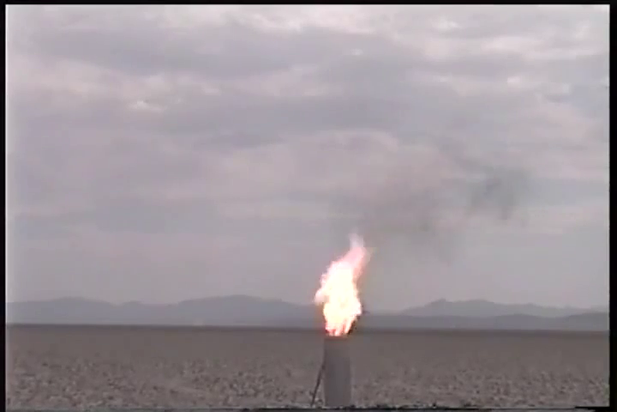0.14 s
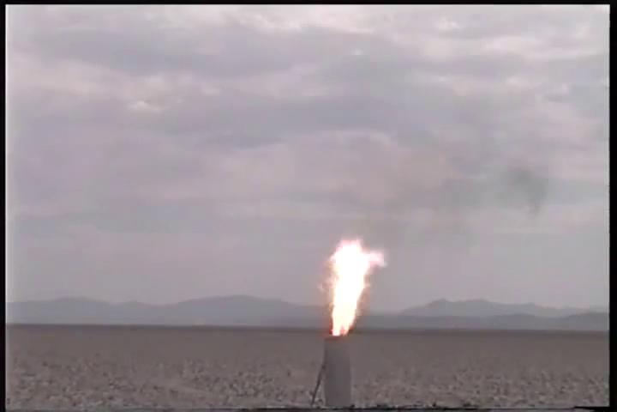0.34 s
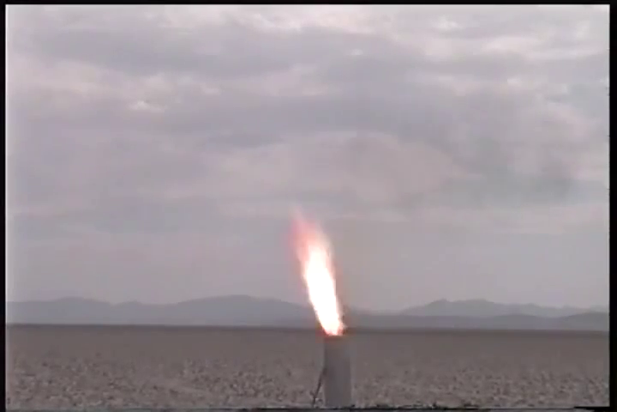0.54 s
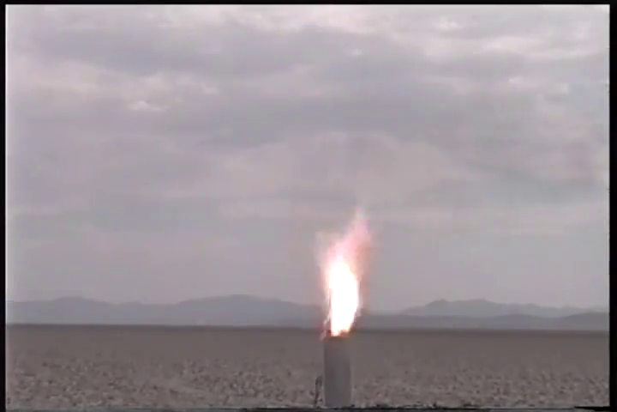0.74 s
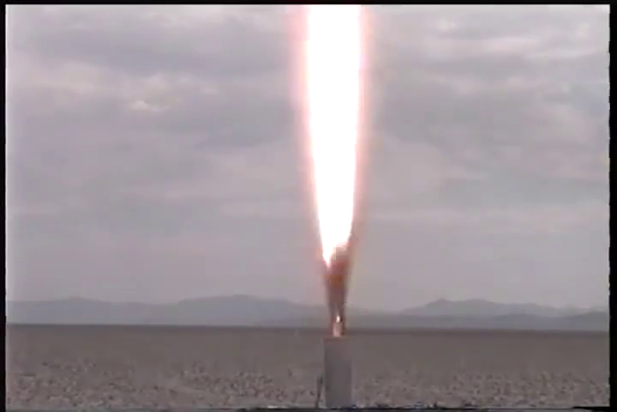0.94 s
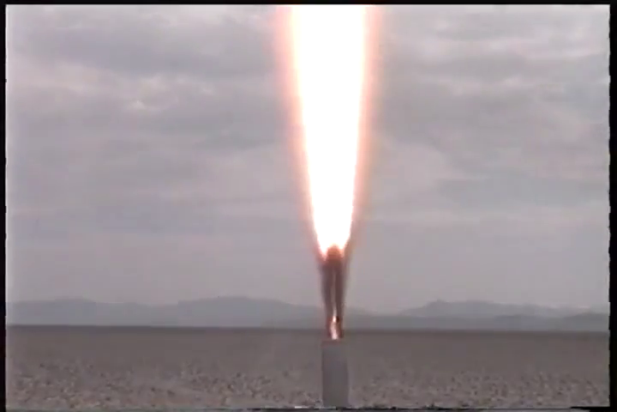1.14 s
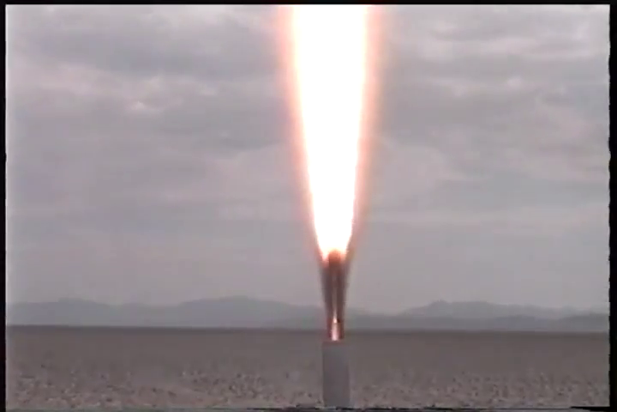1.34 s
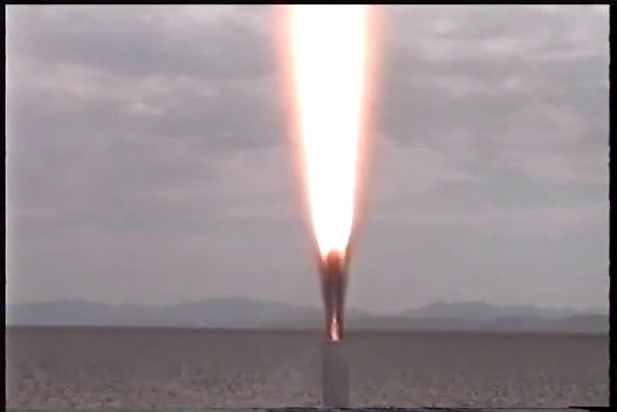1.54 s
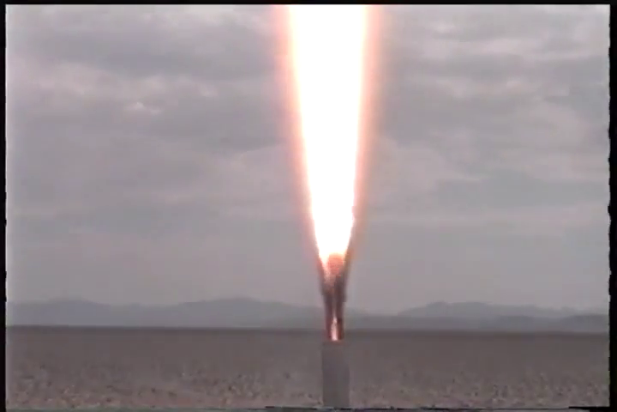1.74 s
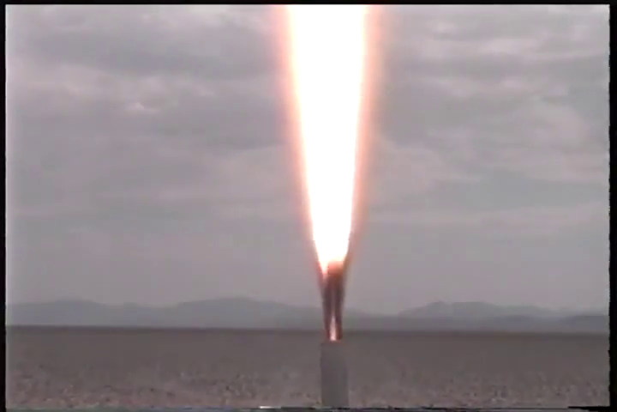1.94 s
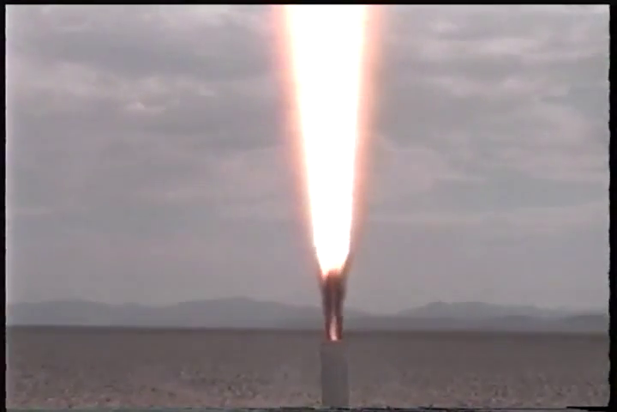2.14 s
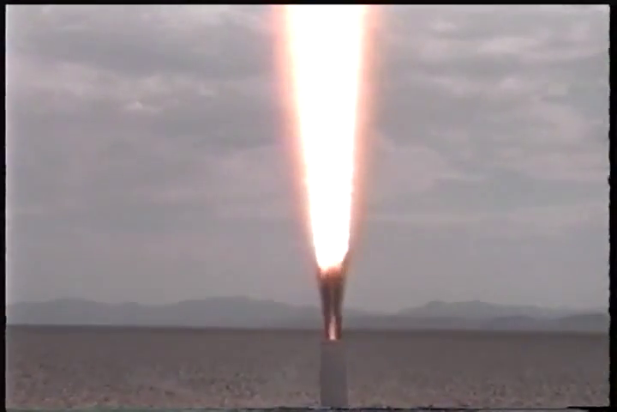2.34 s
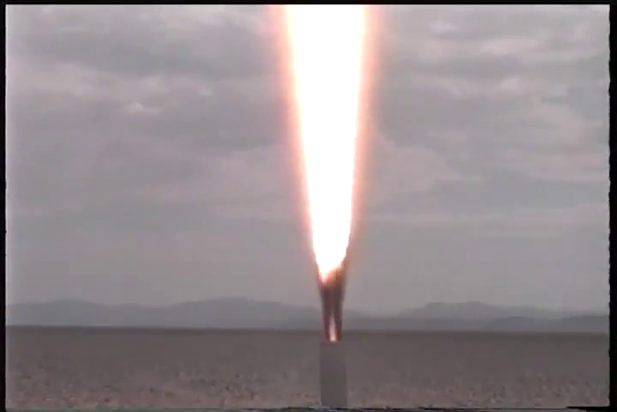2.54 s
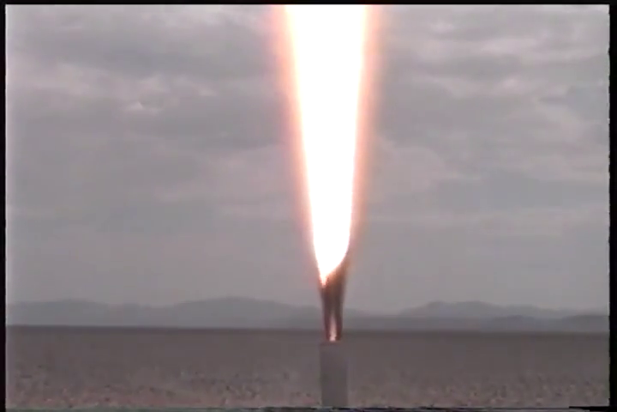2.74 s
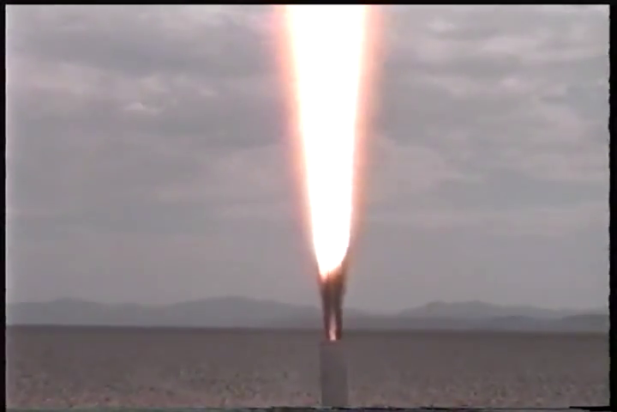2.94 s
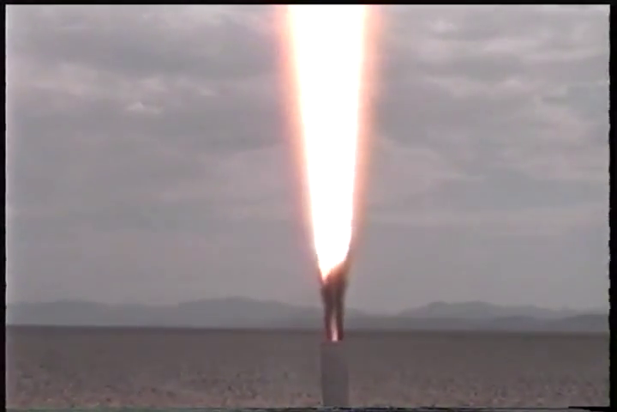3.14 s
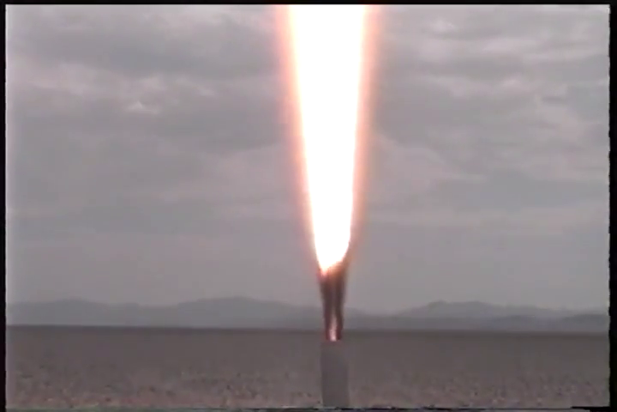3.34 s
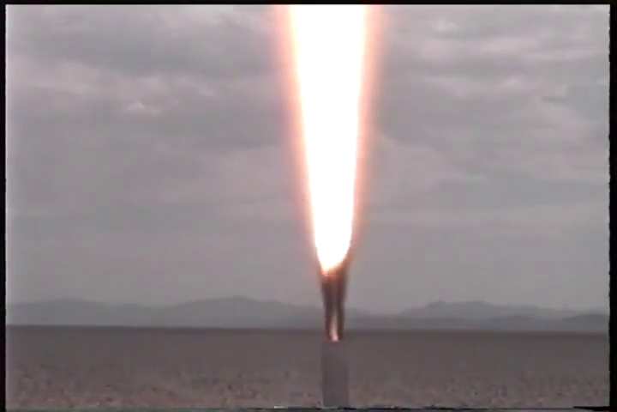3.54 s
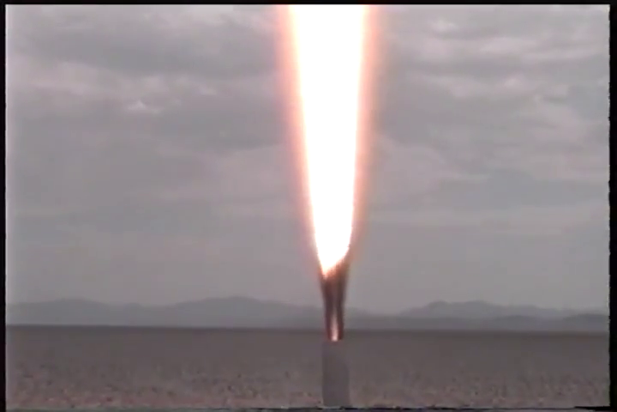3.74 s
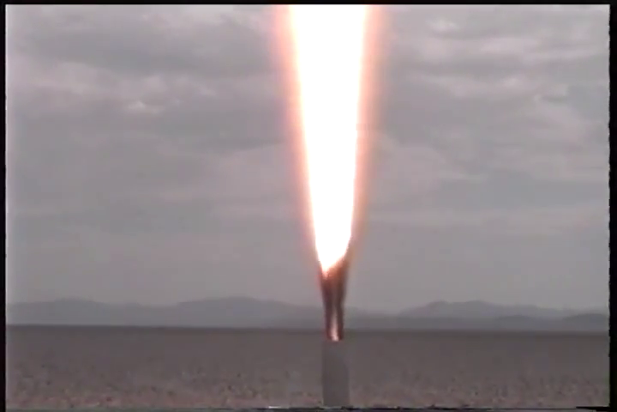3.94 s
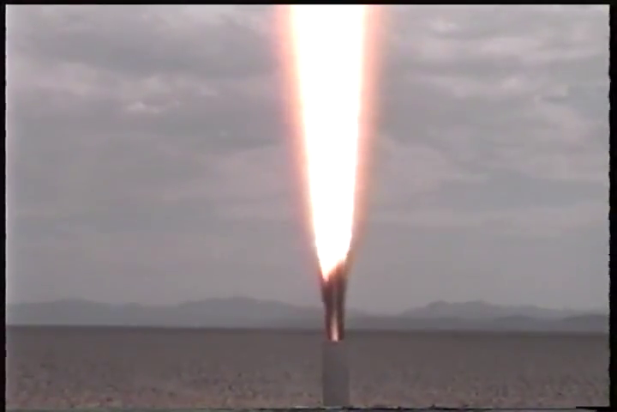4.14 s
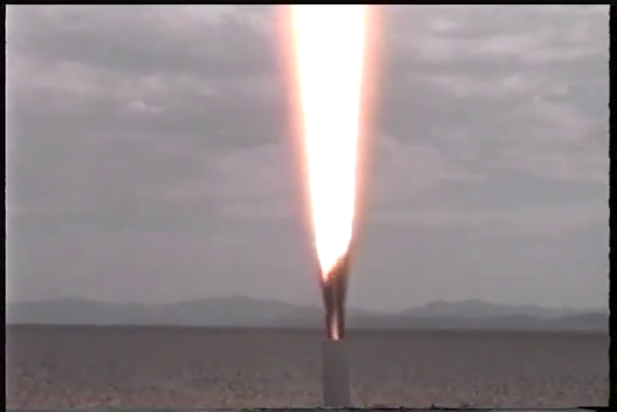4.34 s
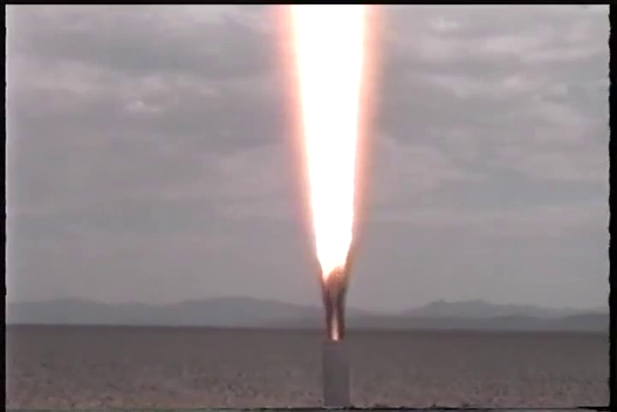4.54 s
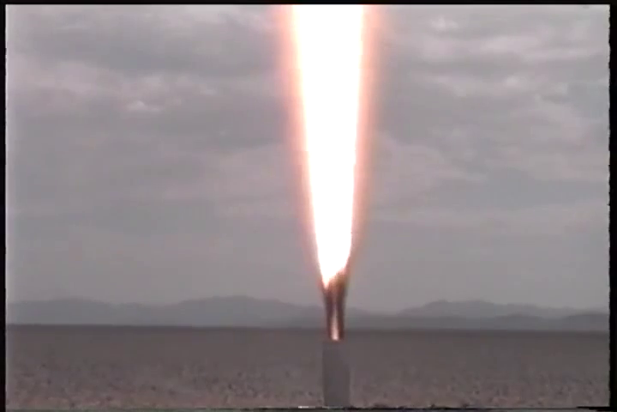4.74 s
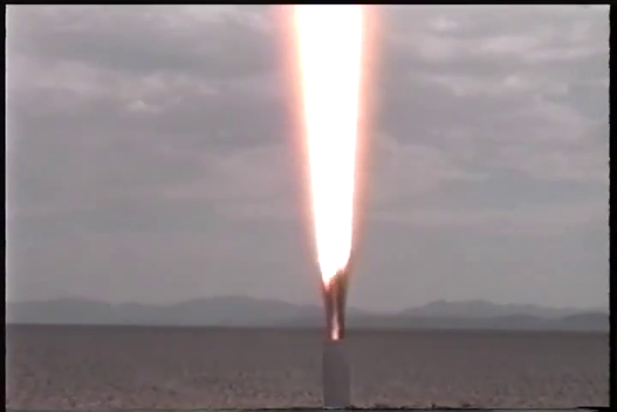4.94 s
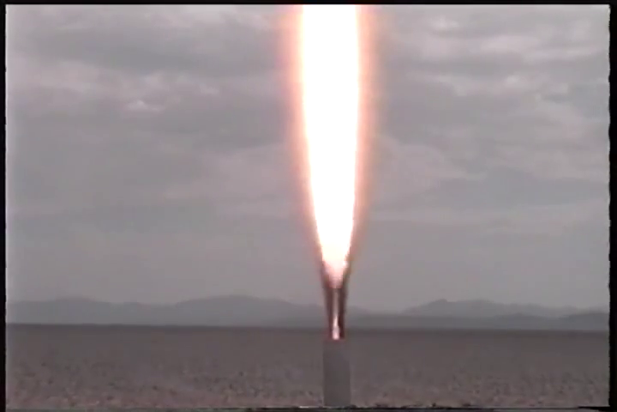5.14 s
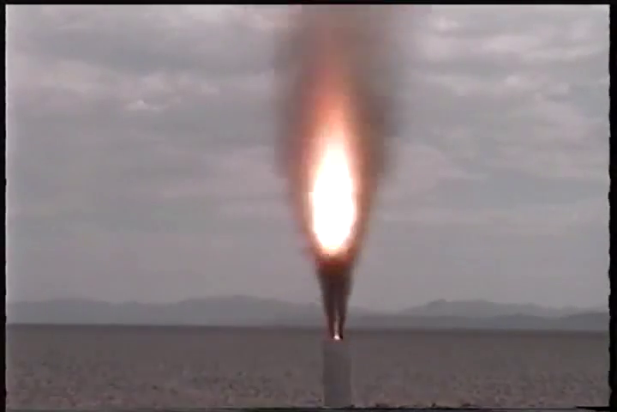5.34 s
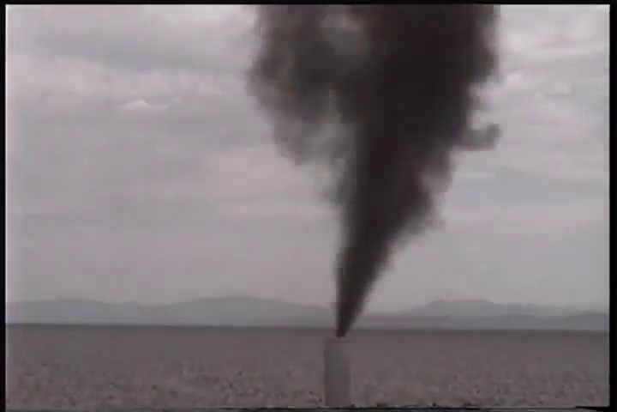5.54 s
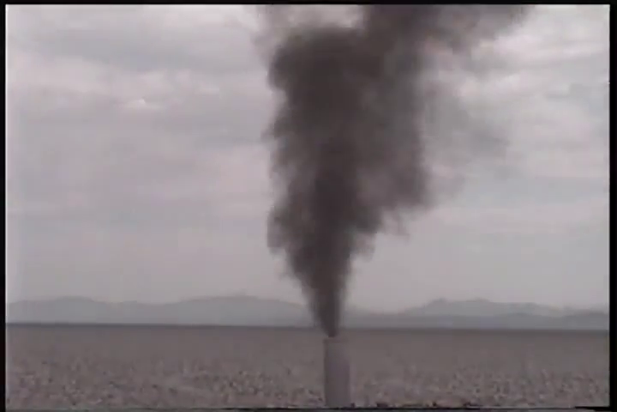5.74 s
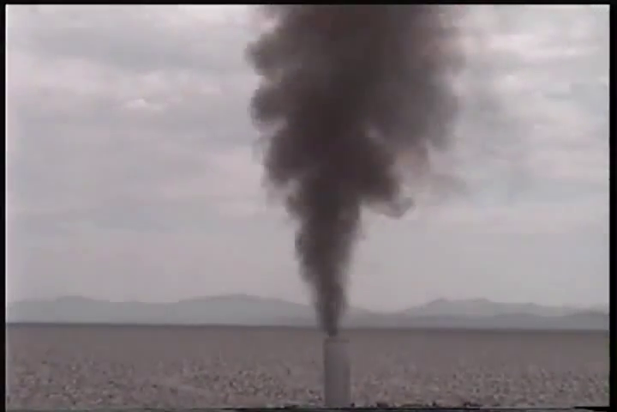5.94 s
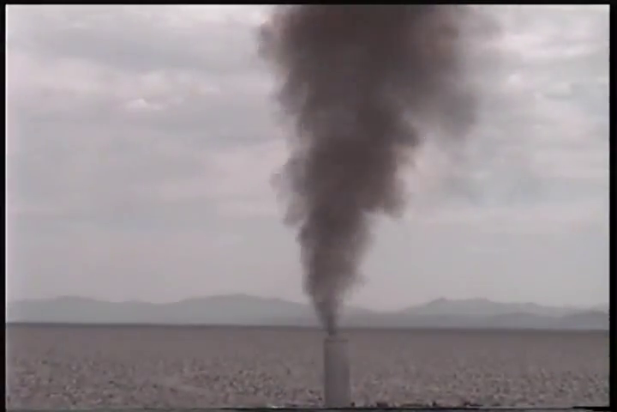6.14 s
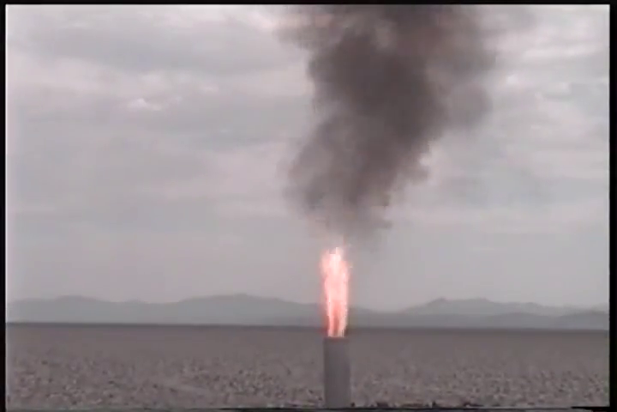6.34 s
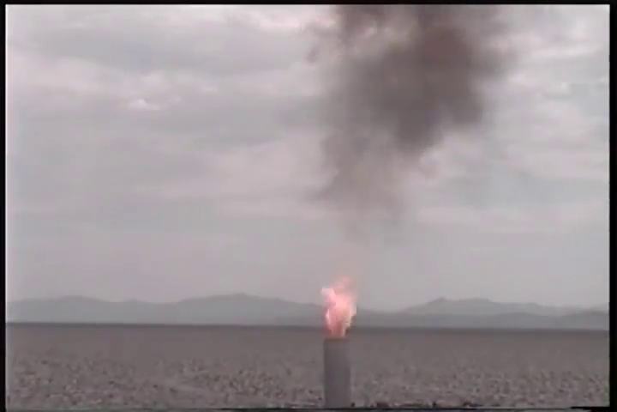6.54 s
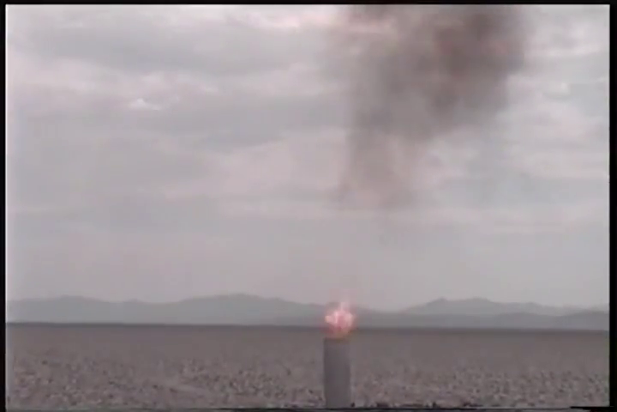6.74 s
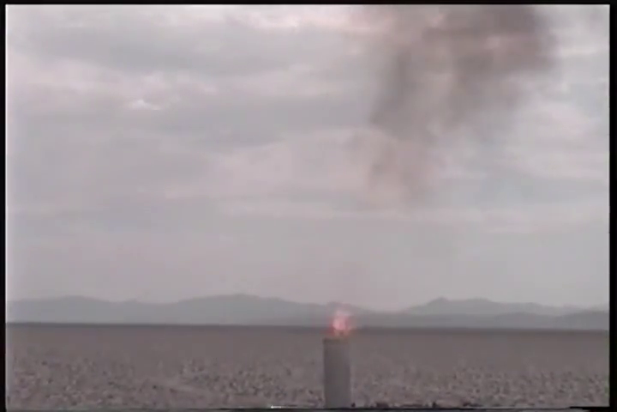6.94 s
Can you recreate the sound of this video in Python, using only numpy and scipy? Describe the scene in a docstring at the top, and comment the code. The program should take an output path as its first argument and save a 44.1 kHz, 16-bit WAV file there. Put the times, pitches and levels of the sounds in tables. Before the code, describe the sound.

Close to a small microphone in open desert, a rocket motor catches with a fluttering, puffing flame. It surges into a rushing, sizzling roar, briefly whistling and distorting the sound, and holds steady for a few seconds. The roar cuts out and a last hiss fades. Leftover gas pops softly alight and dies down with one tiny tick, over faint microphone hiss and a thin whine.

```python
"""A solid rocket motor burns on a test stand in open desert, nozzle up, close to a small camera.
First, over the camera's faint hiss and whine, an unsteady flame puffs and grows. After about a second
the gas goes faster than sound: a brief whistle, and a roaring, hissing jet that overloads the microphone.
Near 5.5 s the fuel runs out, the jet collapses and the motor's case vents smoke.
Then the last gas relights with a soft pop, and the flame dies down with one faint tick."""
import sys
import numpy as np
from scipy.fft import rfft, irfft, next_fast_len
from scipy.io import wavfile
from scipy.ndimage import map_coordinates

SR = 44100
rng = np.random.default_rng(int(sys.argv[2]) if len(sys.argv) > 2 else 0)


def to_wav(sig):
    """Store sig (one row per channel, or 1-D mono) as 16-bit WAV at the path in sys.argv[1].

    Samples outside -1..1 are clipped; the rate is SR.
    """
    pcm = np.clip(np.atleast_2d(sig), -1, 1) * 32767
    pcm = np.round(pcm).astype(np.int16)
    wavfile.write(sys.argv[1], SR, pcm.T)  # frames by channels


N = 308023
T = np.arange(N) / SR

# tone colour (how strong each frequency is) of the camera's own hiss: f/Hz, level/dB
CAMERA_HISS = [(20, 10), (150, 6.5), (400, -2), (1200, -2), (3200, -7), (4700, -4.5), (5800, -10.5),
               (8000, -20.5), (16000, -18.5)]
# faint tones from the camera's tape drive: f/Hz, level/dB
DRIVE_TONES = [(1080, -93), (2170, -87.5), (2815, -86), (3165, -88), (4296, -89.5), (4630, -90.5)]
# how the microphone housing rings, lifting some frequencies and weakening others: f/Hz, level/dB
MIC_HOUSING = [(2000, -2), (2700, 3), (3350, 2), (3650, -1.5), (3900, -1.5), (4350, -6.5), (4550, -10.5),
               (5000, -6.5), (5450, 0.5), (6400, 2.5), (8200, -4.5), (9600, -15), (11500, -5), (14000, -8)]
# low rumble of the flame: f/Hz, level/dB
FLAME_RUMBLE = [(20, -35.5), (50, -18.5), (90, -11), (150, -5.5), (255, -1.5), (320, -2.5), (430, -6),
                (800, -24.5), (2000, -57)]
# roar of the plume, the column of gas above the nozzle: f/Hz, level/dB
PLUME_ROAR = [(100, -41), (280, -4.5), (450, 1), (1200, 1.5), (2000, -3), (3200, -9), (5000, -16),
              (9000, -42), (16000, -46.5)]
# dull hiss of slowly venting gas: f/Hz, level/dB
DULL_HISS = [(25, -14), (45, -18.5), (100, -30.5), (500, -26.5), (1300, -7.5), (1650, -2), (2600, -1.8),
             (3400, -1.1), (5000, -10.5), (8000, -25.5), (16000, -49.5)]
# bright hiss of fast gas: f/Hz, level/dB
BRIGHT_HISS = [(1500, -28), (3000, -8.5), (4500, 4.5), (6200, -0.5), (7800, -8.5), (9000, -21),
               (12000, -18.5), (16000, -31.5)]
# sizzle of the shock waves standing in the jet: f/Hz, level/dB
SHOCK_SIZZLE = [(2500, -38), (5000, -8.5), (7500, 1.5), (10000, -2), (13000, -6.5), (16000, -8)]
# gas flow through the nozzle builds, holds, gives a last surge and vents away: t/s, level/dB
NOZZLE_FLOW = [(0, -53.5), (0.4, -36), (0.57, -29), (0.92, -24), (0.99, -14.5), (3, -16.5), (5.2, -16.5),
               (5.48, -19.5), (5.54, -15.8), (5.655, -17.5), (5.71, -25), (5.735, -34.5), (6.0, -45),
               (6.18, -68.5), (6.3, -76), (6.6, -115)]
# the flame flaps most in a lazy stream, little once the jet tears it up: flow level/dB, flap level/dB
FLAP_BY_FLOW = [(-56, 1.5), (-41.5, 0), (-33.5, 3.5), (-28.5, -1), (-21, -9), (-15, -8.5)]
# the young burn surges and falters: t/s, half length/s, level change/dB
BURN_SURGES = [(0.005, 0.017, -3.5), (0.26, 0.03, 1.5), (0.313, 0.016, -6), (0.404, 0.028, -4.5),
               (0.554, 0.014, -2.5)]
# pockets of gas that catch fire all at once: t/s, level/dB, f/Hz, time to fade by 60 dB/s
GAS_POCKETS = [(0.281, -15, 290, .018), (0.403, -6.5, 230, .02), (0.4266, -4.5, 230, .022),
               (0.696, -3, 260, 0.055), (.834, -4, 250, .025), (0.844, 0.5, 330, 0.017),
               (5.502, -3, 290, 0.013), (6.298, -13, 350, .013)]

RELIGHT_S, RELIGHT_RISE_S = 6.296, 0.0068  # the last gas catches fire again


def amp(db):
    """Turn decibels into a gain, the number a signal is multiplied by."""
    return 10 ** (np.asarray(db) / 20)


def since(s):
    """Seconds since a moment, 0 before it."""
    return np.maximum(T - s, 0)


def burst(s, rise_s, t60, hold_s=0):
    """Gain of something that starts at s, rises, holds, then fades by 60 dB every t60 seconds."""
    return (1 - np.exp(-since(s) / rise_s)) * amp(-60 * since(s + hold_s) / t60)


def colour(points):
    """Join (f/Hz, level/dB) points into a curve that gives the gain at any frequency."""
    f, db = np.transpose(points)
    return lambda hz: amp(np.interp(np.log(hz + 1), np.log(f + 1), db))


def filtered(x, response):
    """Multiply each frequency in x by response(hz)."""
    size = next_fast_len(N + SR // 2)
    hz = np.fft.rfftfreq(size, 1 / SR)
    return irfft(rfft(x, size) * response(hz), size)[:N]


def wobble(rate):
    """A smooth curve through `rate` random values a second."""
    return map_coordinates(rng.standard_normal(int(N * rate / SR) + 4), [T * rate])


def noise(points):
    """Noise with the given tone colour and an average strength (rms) of 1."""
    x = filtered(rng.standard_normal(N), colour(points))
    return x / x.std()


def turbulence(points, swirl_rate, swirl_db):
    """Noise of strength 1 that swells with every passing swirl of gas."""
    x = noise(points) * amp(swirl_db * wobble(swirl_rate))
    return x / x.std()


def camera():
    """The background: steady hiss and the slightly wavering whine of the tape drive."""
    whine = sum(amp(db) * np.sqrt(2) * np.sin(2 * np.pi * hz * T + .8 * wobble(25))
                for hz, db in DRIVE_TONES)
    return amp(-71.5) * noise(CAMERA_HISS) + whine


def tick():
    """A tiny, bright spit of gas as the flame dies down."""
    return amp(-68) * burst(6.742, rise_s=0.0005, t60=0.03) * noise(BRIGHT_HISS)


def whistle(start_s=1.1, hold_s=0.069, start_hz=1324, sag_hz_per_s=690):
    """As pressure peaks, gas whistles over the nozzle's edge; the note wavers and sags."""
    hz = start_hz - sag_hz_per_s * np.minimum(since(start_s), hold_s)
    phase = 2 * np.pi * np.cumsum(hz * (1 + 0.004 * wobble(90))) / SR
    strength = amp(-18) * burst(start_s, rise_s=0.012, t60=0.09, hold_s=hold_s)
    return strength * np.sqrt(2) * np.sin(phase)


def puffs():
    """Each gas pocket gives the air one soft push that swings back and quickly dies."""
    return sum(amp(db) * burst(s, rise_s=0.0011, t60=t60) * np.sin(2 * np.pi * hz * since(s))
               for s, db, hz, t60 in GAS_POCKETS)


def flow():
    """Level of the gas flow through the nozzle in dB, with a short spurt at the relight."""
    main_db = np.interp(T, *np.transpose(NOZZLE_FLOW))
    spurt = amp(-58) * burst(RELIGHT_S, RELIGHT_RISE_S, t60=0.28)
    return 20 * np.log10(amp(main_db) + spurt)


def supersonic(halfway_db=-22):
    """Near 0 while the gas leaves the nozzle slower than sound, near 1 once it is faster."""
    return 1 - 1 / (1 + amp(flow() - halfway_db) ** 4)


def fire(full_s=0.7, lift_s=0.87, settle_s=0.84, flare_s=0.33, out_s=5.495):
    """Gain of the fire outside the nozzle, from its first growth to the small relight."""
    growing_db = -31 * np.maximum(full_s - T, 0)
    # the jet lifts the fire off the nozzle, where it settles to a quieter burn
    lifted_db = -3 * supersonic() - 6.5 * (1 - np.exp(-since(lift_s) / settle_s))
    # as the fuel runs out the fire flares, then goes out
    ending_db = 7 * np.minimum(since(out_s - flare_s) / flare_s, 1) - 604 * since(out_s)
    relit = amp(-48.5) * burst(RELIGHT_S, RELIGHT_RISE_S, t60=0.89)
    return amp(-15 + growing_db + lifted_db + ending_db) + relit


def sputter(flutter_db, rate, steady_s):
    """Gain of the uneven young burn: it surges and flutters, then steadies as pressure builds."""
    unsteady = np.clip(1 - (T / steady_s) ** 2, 0, 1)
    surges_db = sum(db * np.exp(-((T - s) / half_s) ** 2) for s, half_s, db in BURN_SURGES)
    return amp(surges_db + flutter_db * unsteady * np.tanh(wobble(rate)))


def flame(spent_s=6.01):
    """The flame flaps in big, slow swirls; fuel smoulders inside the case until it is spent."""
    flapping = fire() * amp(np.interp(flow(), *np.transpose(FLAP_BY_FLOW)))
    smoulder = amp(-54.5 - 21 * since(spent_s))
    return np.hypot(flapping, smoulder) * turbulence(FLAME_RUMBLE, swirl_rate=80, swirl_db=1.6)


def plume():
    """The plume mixes with the air in smaller, faster swirls: loud while it burns, softer unlit."""
    burning = amp(2.32) * fire()
    unlit = amp(-13 + 0.64 * flow())
    return np.hypot(burning, unlit) * turbulence(PLUME_ROAR, swirl_rate=170, swirl_db=0.87)


def case(x, pipe_hz, echo):
    """The case rings like a pipe at 1, 3, 5... times pipe_hz, until supersonic flow seals it off."""
    round_trip = lambda hz: echo * np.exp(-hz / 6000 - 1j * np.pi * hz / pipe_hz)  # duller and later
    ringing = filtered(x, lambda hz: 1 / (1 + round_trip(hz)))
    return ringing + supersonic() * (x - ringing)


def jet():
    """The nozzle's hiss brightens as the flow grows; faster than sound, shock waves add a sizzle."""
    flow_db = flow()
    dull = amp(0.8 * flow_db - 4.5) * turbulence(DULL_HISS, swirl_rate=200, swirl_db=1.2)
    bright = amp(flow_db + 2) * turbulence(BRIGHT_HISS, swirl_rate=620, swirl_db=1.55)
    sizzle = supersonic() * amp(flow_db - 1.5) * turbulence(SHOCK_SIZZLE, swirl_rate=550, swirl_db=1.0)
    return dull + bright + sizzle


def scene():
    """All the motor's sounds, heard through the microphone housing, over the camera's own noise."""
    roar = case(flame() + plume(), pipe_hz=233.6, echo=0.26)
    burn = (roar + jet()) * sputter(flutter_db=2.5, rate=71, steady_s=0.8)
    motor = burn + puffs() + whistle() + tick()
    return (filtered(motor, colour(MIC_HOUSING)) + camera())[None]


def overload(x, limit_db, hardness, lopsided):
    """The camera's input flattens loud peaks, one side a little sooner, adding fizz and rumble."""
    limit = amp(limit_db) * (1 + lopsided * np.sign(x))
    return x / (1 + np.abs(x / limit) ** hardness) ** (1 / hardness)


def record(dry):
    """The camera lifts the treble, overloads and lowers it again, so hiss distorts before rumble does."""
    lift = lambda hz: (1 + 1j * hz / 2500) / (1 + 1j * hz / 9000)
    clipped = overload(filtered(dry[0], lift), limit_db=-7.0, hardness=2.84, lopsided=0.028)
    low_cut = lambda hz: 1j * hz / (1j * hz + 18)  # removes drift too slow to hear
    treble = colour([(7000, 0), (9700, 3.0), (11500, 3.5), (13500, 0.0), (15500, -5.5)])
    top_hz = 15500
    return filtered(clipped, lambda hz: low_cut(hz) / lift(hz) * treble(hz) * (hz < top_hz))[None]


dry = scene()
out = record(dry)
to_wav(out)
```